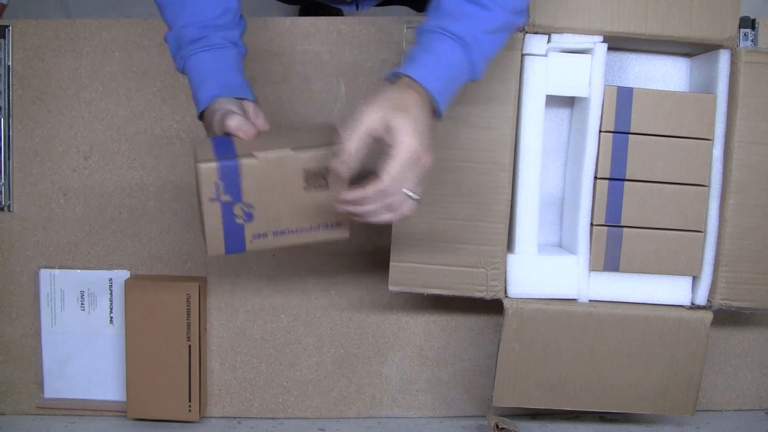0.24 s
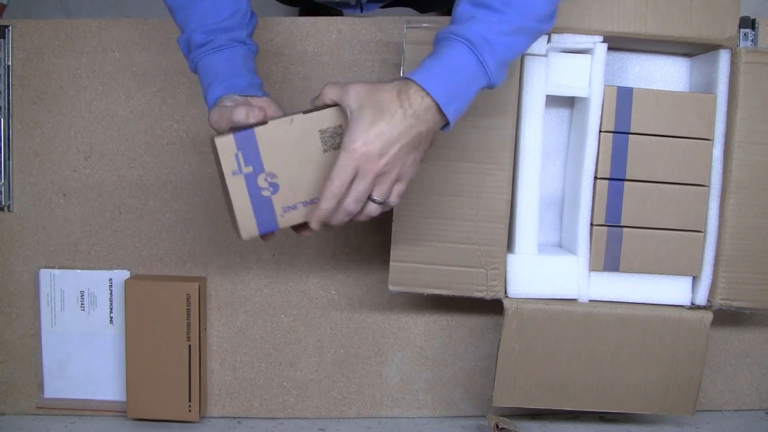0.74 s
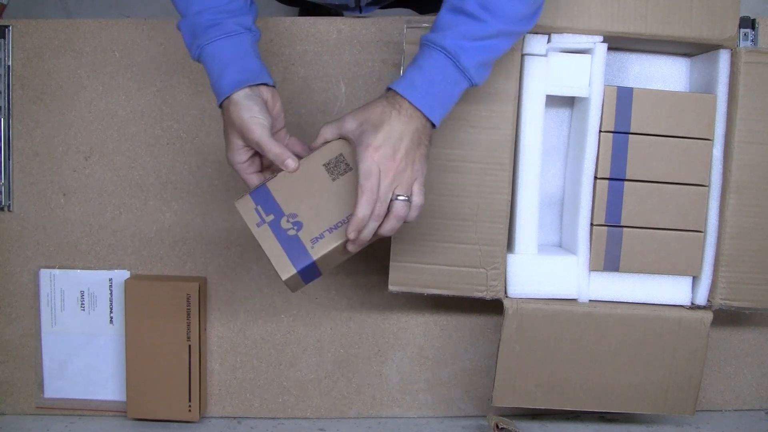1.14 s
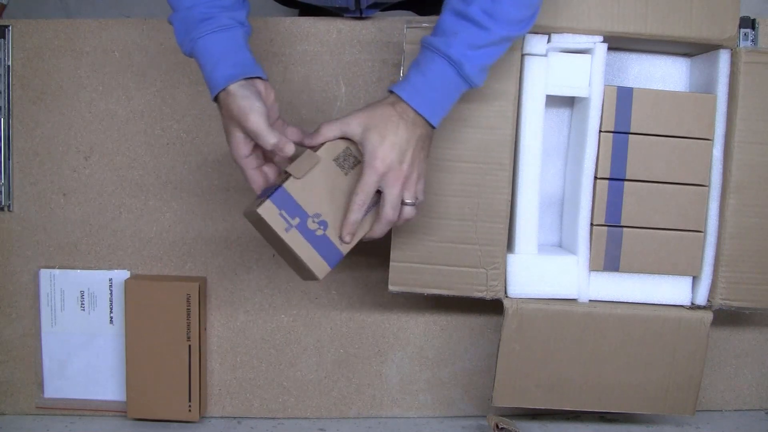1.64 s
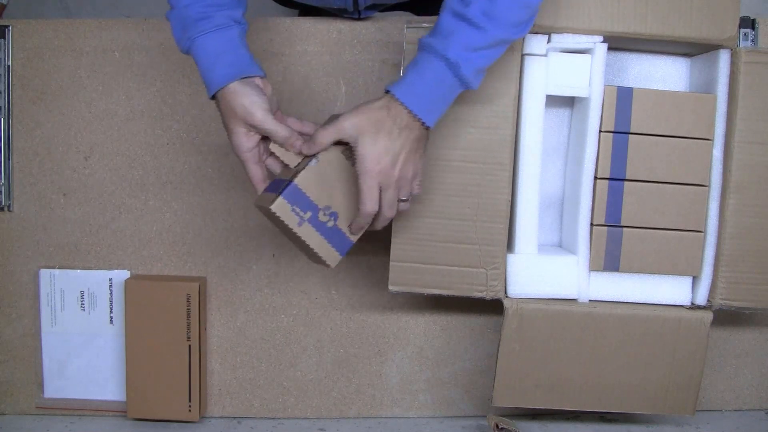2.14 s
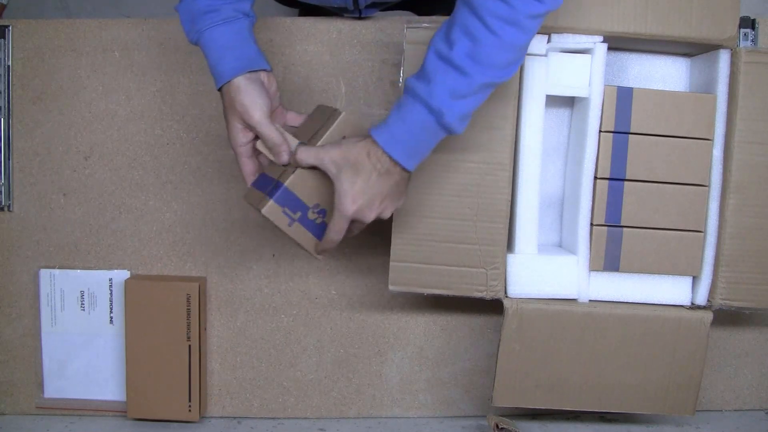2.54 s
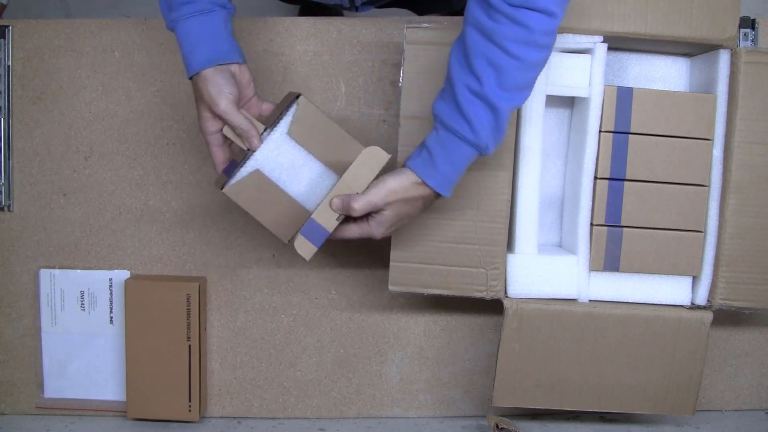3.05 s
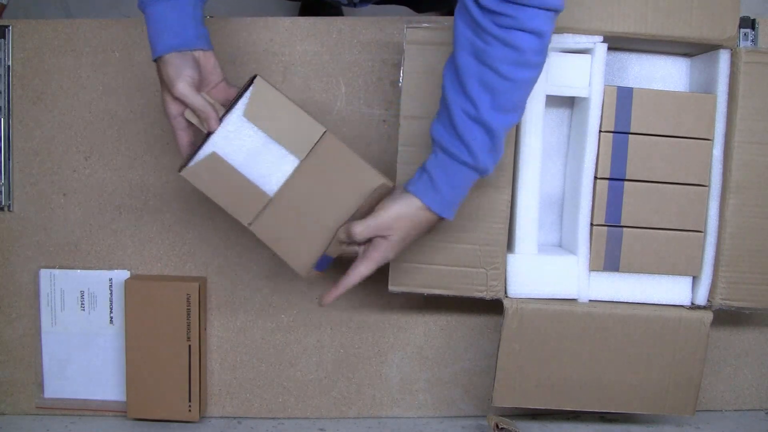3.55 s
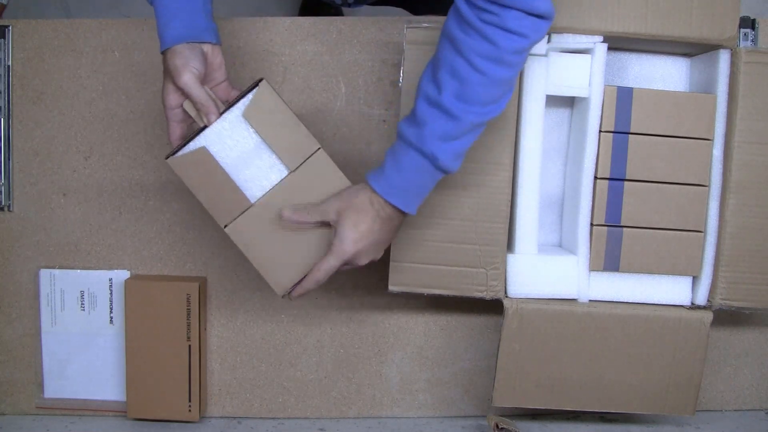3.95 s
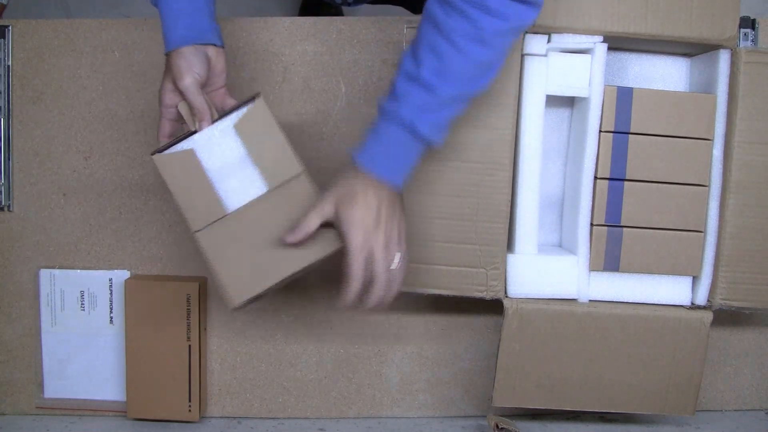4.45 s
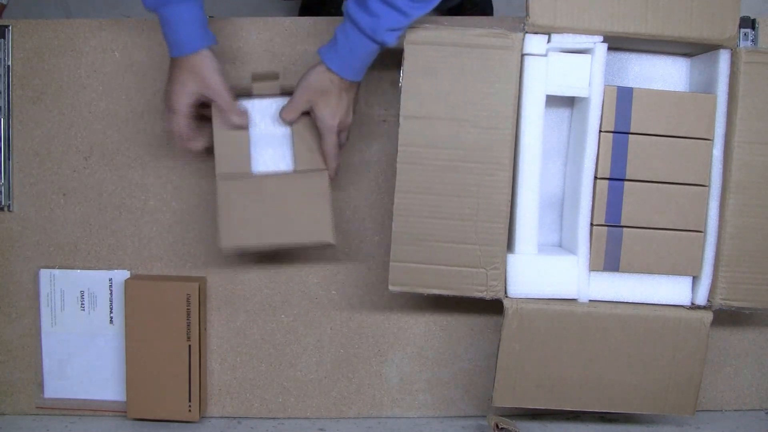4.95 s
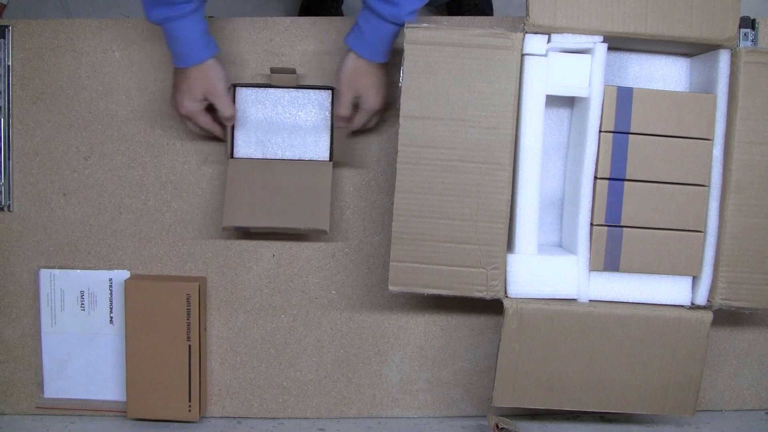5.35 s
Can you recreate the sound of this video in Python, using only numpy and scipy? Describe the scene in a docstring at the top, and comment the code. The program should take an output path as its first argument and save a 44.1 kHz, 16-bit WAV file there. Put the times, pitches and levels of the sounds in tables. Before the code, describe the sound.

Hands handle a small cardboard box in a quiet room, heard from a microphone above, with a faint steady background and a short reverberant tail. During the first second there is a light tap and soft rubbing of skin on board. From about 1.4 to 1.6 seconds the lid flap is pulled out with a jerky, crackling scrape, the loudest sound, carrying a thin squeak and a short bass bump. Small ticks and rubs lead to a second, brighter scrape with snaps at about 2.4 to 2.7 seconds as the flap is folded back. From 3 to 5 seconds softer sliding strokes and scattered hollow taps follow, a little stronger near 3.8 seconds. After a few clicks at 5 seconds, the box is set on the table with a low thud at 5.2 seconds, and light brushing of the flaps continues to the end.

```python
"""In a quiet room, hands turn a small cardboard box; skin rubbing on board hisses and excites its modes.
Near 1.5 s the lid flap is pulled out, and near 2.5 s folded back: the tab sings in its slot while
stick-slip jerks ring the panels and the hollow, each time with a short bass pulse. Softer strokes and
taps follow, until at 5.2 s the box is set down and the table top thuds.
A microphone above hears it all with a short reverberant tail."""
import sys
import numpy as np
from scipy import signal
from scipy.io import wavfile
from scipy.ndimage import uniform_filter1d

SR = 44100
rng = np.random.default_rng(int(sys.argv[2]) if len(sys.argv) > 2 else 0)


def generate_wav(sig):
    """Save sig (samples, or channels by samples) to the path in sys.argv[1] as 16-bit PCM at SR."""
    pcm = np.round(np.clip(np.atleast_2d(sig).T, -1, 1) * 32767).astype(np.int16)
    wavfile.write(sys.argv[1], SR, pcm)


N = 246078

# spectrum of the room tone: (frequency [Hz], relative density [dB])
AIR_SPECTRUM = [(15, -65), (25, -62), (92, -3), (161, -7), (270, 5.5), (384, -0.5), (489, 4), (545, 2),
                (695, 1.5), (2110, -10), (4370, -15.5), (14400, -35.5), (16000, -51.5)]
# likeness of the room tone on the two sides: (frequency [Hz], correlation [-1..1])
AIR_CORRELATION = [(60, 1), (240, -0.35), (950, -0.68), (3770, 0.43), (15000, 0.34)]
# reverberation of the room: (frequency [Hz], t60 [s], relative level [dB])
REVERB_BANDS = [(148, 0.059, 4), (400, 0.3, -12.5), (1000, 0.53, -14.5), (2800, 0.37, -12),
                (7300, 0.36, -12), (14000, 0.34, -24)]
# modes of the low thuds: (frequency [Hz], relative level [dB])
THUD_MODES = [(62, -3), (110, -3.5), (205, 14), (250, 15)]
# two short bass pulses as the flap jerks, then the table top's thud as the box is set down:
# (time [s], level [dB], t60 at 62 Hz [s], gain of modes above 150 Hz [dB])
LOW_THUDS = [(1.521, -37, 0.11, -12), (2.59, -56, 0.16, -16), (5.205, -27, 0.47, -1.5)]
# modes of the air and walls of the whole box: (frequency [Hz], relative level [dB], t60 [s])
HOLLOW_MODES = [(275.6, -8.5, 0.025), (408.5, 1, 0.026), (482, 0.5, 0.008)]
# modes of the cardboard panels: (frequency [Hz], relative level [dB], t60 [s])
PANEL_MODES = [(684, -4.5, 0.023), (780, -3.5, 0.03), (1070, 4, 0.013), (1155, 2.5, 0.012),
               (1430, 3, 0.012), (1574, 5.5, 0.01), (1700, 6, 0.0095), (2110, -1.5, 0.0075),
               (2400, 0.5, 0.0093), (2800, -1.5, 0.0074), (3060, 3.5, 0.0032)]
# crackle of paper fibres: (frequency [Hz], relative density [dB])
FIBRE_SPECTRUM = [(1500, -10.5), (2500, -2.5), (3600, -3.5), (4500, -5.5), (6800, -11.5), (9000, -12),
                  (11500, -18.5), (14000, -31.5), (16000, -46.5)]
# the tab's edge singing in its slot: (time [s], pitch [Hz], level re hiss [dB])
TAB_SONG = [(1.3, 4900, -40), (1.37, 4800, -4.5), (1.46, 4800, -3.5), (1.475, 5700, -8.5),
            (1.56, 5600, -30), (2.17, 4970, -32), (2.24, 5060, -5), (2.33, 5300, -1), (2.41, 5350, -1),
            (2.44, 6360, -6), (2.54, 6060, 4.5), (2.555, 8260, -10), (2.62, 8740, -9), (2.8, 8400, -12),
            (2.95, 8500, -36)]
# rubbing strokes: (time of hardest pressure [s], hiss level [dB], swell [s], fade [s],
# fizz re rasp [dB], panels re hiss [dB], hollow re hiss [dB], panel pitch [Hz])
RUB_STROKES = [(0.05, -60, 0.083, 0.28, 6, -1.5, -9, 1080), (0.62, -71, 0.13, 0.63, 14, -4, -11, 1000),
               (0.828, -58, 0.17, 0.46, 3, -3, -8, 1120), (0.948, -56.5, 0.051, 0.027, 0.5, -1, -7, 1050),
               (1.244, -77, 1, 0.14, 2.5, 11, 11.5, 1110), (1.371, -60.5, 0.065, 0.046, 6, 11, 9, 1550),
               (1.404, -30.5, 0.032, 0.13, -10.5, -1.5, -12, 1610),
               (1.48, -27, 0.13, 0.064, -8.5, 1.5, -18, 1700),
               (1.99, -49.5, 0.11, 0.17, -4.5, -3, -19, 2380), (2.028, -37, 0.049, 0.033, 4, -6, -5, 1550),
               (2.15, -54.5, 0.97, 0.13, 13, -0.5, -9, 1290), (2.239, -47, .05, 0.066, -3, -3.5, 1.5, 1010),
               (2.299, -44.5, 0.09, 0.068, -5.5, 4, 9.5, 1090), (2.389, -48, 0.12, 0.087, 0, 4.5, 6, 1000),
               (2.447, -30, 0.056, 0.1, 0.5, 2, -15, 2800),
               (2.568, -23.5, 0.015, 0.081, 6, -3, -13.5, 1700),
               (2.609, -20.5, 0.058, 0.053, 4.5, -5, -36, 2880), (2.8, -62, .2, 0.6, -3.5, 0.5, -10, 1300),
               (2.963, -49.5, 0.059, 0.071, -7.5, 3.5, -7, 800), (3.083, -59, 0.066, 0.23, -5, 6.5, 0, 850),
               (3.248, -49.5, 0.16, 0.14, -4.5, -1.5, -13.5, 1110),
               (3.391, -49.5, 0.094, 0.069, -2.5, 0.5, -9.5, 1200),
               (3.532, -53.5, 0.15, 0.14, -2, 1, -3, 730), (3.62, -50.5, 0.31, 0.081, -2, -3, -25, 1550),
               (3.76, -50.5, 0.084, 0.21, -5.5, -4, 4, 800),
               (3.839, -44.5, 0.075, 0.032, 0.5, 5.5, 2, 1500), (3.986, -52.5, 0.25, 0.16, -4, 2, -1, 780),
               (4.27, -53.5, 0.28, 0.13, -0.5, 1, -11.5, 1730),
               (4.43, -47, 0.11, 0.062, -2.5, 1.5, -5.5, 1760),
               (4.608, -55.5, 0.07, 0.15, -8, 0.5, -5, 1680),
               (4.809, -47.5, 0.19, 0.15, -2.5, -3.5, -7, 1120),
               (5.1, -52.5, 0.24, 0.65, -6.5, 2.5, 1.5, 1070),
               (5.185, -61.5, 0.074, 0.074, 7, 5, 20.5, 1390), (5.29, -50, 0.34, 0.14, -9, -2, 3.5, 1850),
               (5.431, -51, 0.43, 0.21, 4, 0, -1.5, 1000), (5.515, -50.5, 0.12, 0.4, -12.5, 4.5, -24, 1710),
               (5.566, -54, 0.023, 0.023, 5, 8, 13, 1800)]
# constant friction of the holding hand:
# (hiss level [dB], fizz re rasp [dB], panels re hiss [dB], hollow re hiss [dB], panel pitch [Hz])
HAND_GRIP = (-83.5, 16, 10.5, 1.5, 1002)
# taps and stick-slip jerks: (time [s], ring peak [dB], panel pitch [Hz], hollow re ring [dB],
# crack re ring [dB], contact decay time [ms])
BOX_JERKS = [(0.158, -30.5, 1100, 2.5, 1, 4.5), (0.785, -42.5, 1120, -0.5, -4, 3.2),
             (0.82, -38, 1130, -22, -4, 3.4), (1.02, -38.5, 1070, -4.5, -5.5, 5.4),
             (1.392, -13.5, 1650, -11, 3, 5), (1.409, -21, 1700, -7, -15, 4.2),
             (1.425, -20.5, 1600, -23, -6, 5.2), (1.449, -20.5, 1700, -18, -6, 11),
             (1.463, -22, 1700, -15, -2, 2.8), (1.469, -10.5, 1700, -19, -14, 7.1),
             (1.48, -16.5, 1480, -33, -4.5, 4), (1.493, -4, 1560, -15, -12.5, 5.3),
             (1.515, -17.5, 1620, -3, -24, 3.5), (1.521, -4, 1020, -7, -4.5, 3.5),
             (1.531, -22, 1070, 0.5, 1.5, 5.5), (1.653, -41.5, 3100, -20, 4, 2.8),
             (1.786, -53, 2900, -24, -2, 3), (1.882, -35, 2400, -6.5, 1.5, 4.3),
             (1.915, -44.5, 1630, -18, 12.5, 17), (2.026, -33, 1700, -13, 8, 5),
             (2.087, -54, 2800, -20, 15, 2.5), (2.106, -36.5, 2400, -34, -6, 15),
             (2.122, -38.5, 1500, -31, 4, 6), (2.192, -57, 2800, -20, 20, 2.5),
             (2.226, -43, 1010, -19, 8, 6.2), (2.276, -45, 1000, -17, 1, 4.3),
             (2.301, -28, 1000, -19, -4, 4.8), (2.359, -32.5, 1000, -23, 3, 1.8),
             (2.39, -37, 1070, -16, 9.5, 16), (2.433, -27, 2780, -36, 6, 13),
             (2.448, -21.5, 2950, -15, -6, 15), (2.479, -20.5, 2770, -5.5, 7, 8.5),
             (2.558, -20.5, 2860, -11.5, 3, 3), (2.562, -24, 2570, -7, -7, 36),
             (2.567, -15, 2600, -24, -8, 3), (2.593, -13, 2920, -9.5, -11, 18),
             (2.602, -19, 2880, -37, -3, 13), (2.611, -13, 2680, -25, -15.5, 3.7),
             (2.948, -32.5, 2380, -27, -6.5, 4.4), (3.069, -50.5, 900, -18, 5, 4.5),
             (3.082, -35.5, 910, -40, -15, 7.2), (3.195, -38.5, 1070, -16, -28, 5.7),
             (3.526, -46, 735, 6.5, 7, 4.3), (3.682, -30, 770, -11.5, -4.5, 6.6),
             (3.836, -24.5, 1700, -13, -4, 4.8), (3.893, -25.5, 800, 1, -40, 8.8),
             (3.942, -43.5, 789, 5, -37, 9.8), (4.029, -36, 1580, -4, -4.5, 4.5),
             (4.153, -45.5, 1770, -20, 5, 7.7), (4.241, -34, 2050, -25, -6, 6.3),
             (4.249, -32.5, 1800, -17, 1, 7.7), (4.288, -53.5, 1700, -20, 15, 5.9),
             (4.399, -35.5, 2150, -14.5, -27, 21), (4.436, -37, 1740, -5.5, -3, 5.7),
             (4.742, -32, 1000, -5.5, -4, 4.3), (5.018, -28, 1430, -19, -6, 4.9),
             (5.021, -24, 1070, -24, -9, 3.5), (5.032, -33, 970, 0.5, -1.5, 10),
             (5.064, -41, 1700, -14, -4, 4.5), (5.203, -26.5, 780, 13, -32, 8.3),
             (5.221, -38, 700, -11, 5.5, 7.2), (5.284, -35, 2070, -27, -19, 4.6),
             (5.517, -36.5, 1820, -11, 2.5, 4.4)]


def amp(db):
    return 10 ** (np.asarray(db) / 20)


def unit_rms(x):
    return x / np.sqrt(np.mean(x ** 2) + 1e-20)


def unit_peak(x):
    return x / (abs(x).max() + 1e-12)


def curve_at(points, hz):
    f, value = np.transpose(points)
    return np.interp(np.log(hz + 1), np.log(f + 1), value)


def add(mix, s, sound):
    part = mix[round(s * SR):][:len(sound)]
    part += sound[:len(part)]


def room_tone():
    """Partial coherence: the two sides share part of a steady noise whose spectrum drifts faintly."""
    frames, hz = N // 256 + 5, np.fft.rfftfreq(1024, 1 / SR)
    a, b, c, d, patches = rng.standard_normal((frames, 513, 5)).T
    patches = unit_rms(uniform_filter1d(uniform_filter1d(patches, 12, 0), 14, 1))
    same = curve_at(AIR_CORRELATION, hz)[:, None]
    left = a + 1j * b
    right = same * left + np.sqrt(1 - same ** 2) * (c + 1j * d)
    spectra = np.array([left, right]) * amp(curve_at(AIR_SPECTRUM, hz)[:, None] + 1.5 * patches)
    return amp(-53.5) * unit_rms(signal.istft(spectra, nperseg=1024, noverlap=768)[1][:, :N])


def reverberation(x):
    """Sparse reflections decay exponentially, each band at its own rate; the two sides share the bass."""
    taps = np.zeros((2, SR // 2))
    arrivals = np.arange(300, SR // 2 - 20, 20)
    arrivals = arrivals + rng.integers(0, 20, (2, len(arrivals)))
    np.put_along_axis(taps, arrivals, rng.choice([-1., 1.], arrivals.shape), 1)
    hz, t, (left, independent) = signal.stft(taps, SR, nperseg=256)
    same = curve_at([(300, 0.97), (3000, 0.6), (10000, 0.18)], hz)[:, None]
    spectra = np.array([left, same * left + np.sqrt(1 - same ** 2) * independent])
    band_hz, *columns = np.transpose(REVERB_BANDS)
    t60, db = (curve_at(np.c_[band_hz, column], hz)[:, None] for column in columns)
    tail = signal.istft(spectra * amp(db - 60 * t / t60) / np.sqrt(t60 * 150), SR, nperseg=256)[1]
    return signal.fftconvolve(x[None], tail, axes=1)[:, :N]


def flap_reflections(x):
    """Early reflection: treble thrown back by the flaps reaches the two microphone ports in antiphase."""
    taps = rng.standard_normal(5000) * np.exp(-np.arange(5000) / 470.0)
    treble = signal.lfilter(*signal.butter(2, 7000, "high", fs=SR), x)
    return np.outer([1, -1], signal.oaconvolve(treble, taps / np.linalg.norm(taps))[:N])


def low_thuds():
    """Damped vibration: blurred low notes pulse as the flap jerks and thud as the box is set down."""
    out, t = np.zeros(N), np.arange(SR // 2) / SR
    bursts = rng.standard_normal((len(LOW_THUDS), 3000)) * np.exp(-t[:3000] / 0.023)
    for (s, db, t60, upper_db), burst in zip(LOW_THUDS, bursts):
        ring = np.zeros(len(t))
        for hz, mode_db in THUD_MODES:
            decay_db = 60 * t * (hz / 62) ** 0.79 / t60
            ring += amp(mode_db + upper_db * (hz > 150) - decay_db) * np.sin(2 * np.pi * hz * t)
        blurred = signal.fftconvolve(ring, burst)[:len(t)]
        thud = unit_peak(ring) + 0.76 * unit_peak(blurred)
        add(out, s, amp(db) * thud * (1 - np.exp(-t / 0.0066)))
    return out


def mode_rings(modes):
    """Normal modes: each is a damped sine with a brief build-up; neighbours swing in opposite sense."""
    hz, db, t60 = np.transpose(modes)[:, :, None]
    t = np.arange(4000) / SR
    sense = (-1.) ** np.arange(len(modes))[:, None]
    return sense * amp(db - 60 * t / t60) * np.sin(2 * np.pi * hz * t) * (1 - np.exp(-t * hz / 0.56))


def panel_coupling(hz, octaves):
    """Modal coupling: a touch drives most strongly the modes near the pitch of the touched panel."""
    above = np.log2(np.transpose(PANEL_MODES)[0][:, None] / hz)
    return np.exp(-.5 * (above / octaves) ** 2) + 0.22 * amp(-4 * np.maximum(above, 0))


def fibre_click():
    """Impulse response of the paper fibres: a minimum-phase click with their spectrum."""
    half = np.log(amp(curve_at(FIBRE_SPECTRUM, np.fft.rfftfreq(2048, 1 / SR))))
    log_magnitude = np.concatenate([half, half[-2:0:-1]])
    return np.fft.ifft(np.exp(np.conj(signal.hilbert(log_magnitude)))).real[:1024]


def grit(per_s, spread_db):
    """Shot noise: a rough surface catches at random instants, a few of the catches large."""
    size = amp(spread_db * np.minimum(rng.exponential(1, N), 5)) * rng.standard_normal(N)
    return unit_rms(size * (rng.random(N) < per_s / SR))


def contact_curves():
    """Incoherent sources add in power: strokes, grip and settling flaps; the strongest sets the tone."""
    t = np.arange(0, N + 64, 64) / SR
    # after each jerk the flaps shiver on, like a faint stroke (columns as in RUB_STROKES)
    settling = [(s + .006, db - 40, .006, 0.18, -4, 14, 18.5 + min(hollow_db, -6), hz)
                for s, db, hz, hollow_db, *_ in BOX_JERKS]
    s, db, swell, fade, *tone = np.transpose(RUB_STROKES + settling)[:, :, None]
    away = np.where(t < s, (s - t) / swell, (t - s) / fade)
    stroke_db = db - 32.5 * away ** 1.137  # 32.5 dB up over the swell and down over the fade
    level_db = np.vstack([stroke_db, np.full(len(t), HAND_GRIP[0])])
    fizz_db, panel_db, hollow_db, hz = (np.vstack([c, [[grip]]]) for c, grip in zip(tone, HAND_GRIP[1:]))
    hiss, panel, hollow = (amp(2 * (level_db + extra_db)) for extra_db in (0, panel_db, hollow_db))
    hiss_db, all_panel_db, all_hollow_db = (10 * np.log10(p.sum(0)) for p in (hiss, panel, hollow))
    mean_fizz_db = (hiss * fizz_db).sum(0) / hiss.sum(0)
    mean_hz = (panel * hz).sum(0) / panel.sum(0)
    curves = hiss_db, mean_fizz_db, all_panel_db - hiss_db, all_hollow_db - hiss_db, mean_hz
    return [np.interp(np.arange(N) / SR, t, curve) for curve in curves]


def surface_hiss(friction, fizz_db, skin_hz=11600, skin_width_hz=5900):
    """Friction noise: lightly brushed skin fizzes at a broad resonance; pressed board rasps lower."""
    fibres = signal.oaconvolve(friction, fibre_click())[:N]
    skin = signal.lfilter(*signal.iirpeak(skin_hz, skin_hz / skin_width_hz, SR), fibres)
    rasp = signal.sosfilt(signal.butter(3, 6800, fs=SR, output="sos"), fibres)
    fizz = signal.sosfilt(signal.butter(3, 6800, "high", fs=SR, output="sos"), fibres + amp(4.7) * skin)
    hiss = unit_rms(rasp) * amp(-fizz_db / 2) + unit_rms(fizz) * amp(fizz_db / 2)
    hiss /= np.sqrt(amp(fizz_db) + amp(-fizz_db))
    # the colour shifts as the skin finds new board, in patches about 1 kHz wide and 60 ms long
    spectra = signal.stft(hiss, nperseg=256)[2]
    patches = uniform_filter1d(uniform_filter1d(rng.standard_normal(spectra.shape), 6, 0), 20, 1)
    return unit_rms(signal.istft(spectra * amp(3 * unit_rms(patches)), nperseg=256)[1][:N])


def tab_song(friction, width_hz=570):
    """Resonance: friction drives the tab's edge, which sings at a gliding pitch in its slot."""
    s, hz, db = np.transpose(TAB_SONG)
    t = np.arange(N) / SR
    carrier = np.exp(2j * np.pi * np.cumsum(np.interp(t, s, hz)) / SR)
    pole = np.exp(-np.pi * width_hz / SR)
    envelope = signal.lfilter([1], [1, -2 * pole, pole ** 2], friction / carrier)
    return amp(np.interp(t, s, db)) * unit_rms((carrier * envelope).real)


def rubbing():
    """Forced vibration: grit under the sliding hand hisses and keeps panels and hollow murmuring."""
    hiss_db, fizz_db, panel_db, hollow_db, hz = contact_curves()
    stutter = amp(1.48 * unit_rms(uniform_filter1d(uniform_filter1d(rng.standard_normal(N), 250), 250)))
    fine = stutter * (grit(per_s=12000, spread_db=1.3) + 0.15 * grit(per_s=65, spread_db=2.5))
    coarse = stutter * grit(per_s=6000, spread_db=0.81)
    hiss = surface_hiss(fine, fizz_db) + tab_song(fine)
    # the harder the hand presses, the more the panel under it stands out
    focus = amp(0.87 * (hiss_db + 41))
    coupling = panel_coupling(hz, octaves=1) + focus * panel_coupling(hz, octaves=.12)
    coupling /= np.sqrt((coupling ** 2).mean(0))
    forces = coarse * coupling * amp(hiss_db + panel_db)
    rings = mode_rings(PANEL_MODES)
    panels = sum(signal.oaconvolve(force, ring)[:N] for force, ring in zip(forces, rings))
    panels /= np.sqrt(len(rings)) * np.linalg.norm(rings[0])
    hollow = mode_rings(HOLLOW_MODES).sum(0)
    murmur = signal.oaconvolve(coarse * amp(hiss_db + hollow_db), hollow / np.linalg.norm(hollow))[:N]
    return amp(hiss_db) * hiss + panels + murmur


def jerks():
    """Impulsive excitation: each short rough push rings the panels and hollow and cracks the surface."""
    out, t, click = np.zeros(N), np.arange(2000) / SR, fibre_click()
    panel_rings, hollow_ring = mode_rings(PANEL_MODES), mode_rings(HOLLOW_MODES).sum(0)
    for s, db, hz, hollow_db, crack_db, contact_ms in BOX_JERKS:
        age = t / (contact_ms / 1000)
        push = rng.standard_normal(len(t)) * (1 - np.exp(-t / .0004)) * np.exp(-age)
        panel = panel_coupling(hz, octaves=0.19)[:, 0] @ panel_rings
        sound = unit_peak(signal.fftconvolve(push + 7.5 * (t == 0), panel))
        smooth_push = age * np.exp(-age * 7.8) * np.cos(2 * np.pi * 390 * t)
        sound += amp(hollow_db) * unit_peak(signal.fftconvolve(smooth_push, hollow_ring))
        snap = 6 / contact_ms * (t == t[20])  # strongest for short contacts
        crack = signal.fftconvolve(push * np.exp(-.5 * age) + snap, click)
        crack = signal.lfilter([1, -.65], [1], crack)  # breaking fibres are brighter than brushed ones
        cutoff_hz = np.clip(16000 * amp(0.63 * crack_db), 3000, SR / 2.2)  # a fleshy touch is dull
        crack = signal.lfilter(*signal.butter(2, cutoff_hz, fs=SR), crack)
        add(sound, 0, amp(crack_db) * unit_peak(crack))
        add(out, s - .001, amp(db) * sound)
    return out


def scene():
    """Superposition of the box's direct sound, its reflections, the low thuds and the room tone."""
    radiation = signal.butter(7, 250, "high", fs=SR, output="sos")  # a small box radiates no bass
    box = signal.sosfilt(radiation, jerks() + rubbing())
    return box + amp(-6.5) * flap_reflections(box) + reverberation(box) + low_thuds() + room_tone()


def record(dry):
    """Band limiting: the microphone drops the deepest bass, then a low-pass cuts the highest treble."""
    dry = signal.lfilter(*signal.butter(2, 48, "high", fs=SR), dry)
    return signal.oaconvolve(dry, signal.firwin(511, 16200, window=("kaiser", 9), fs=SR)[None], "same")


dry = scene()
out = record(dry)
generate_wav(out)
```